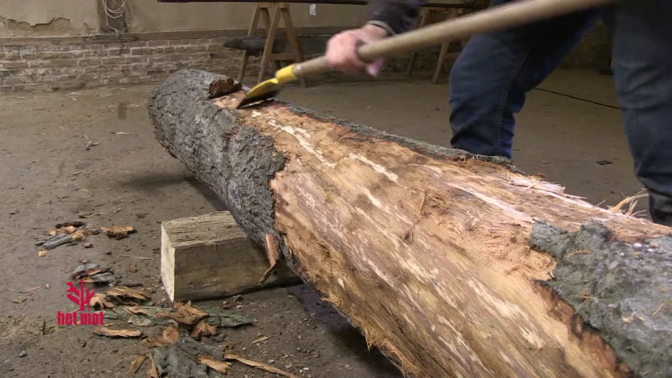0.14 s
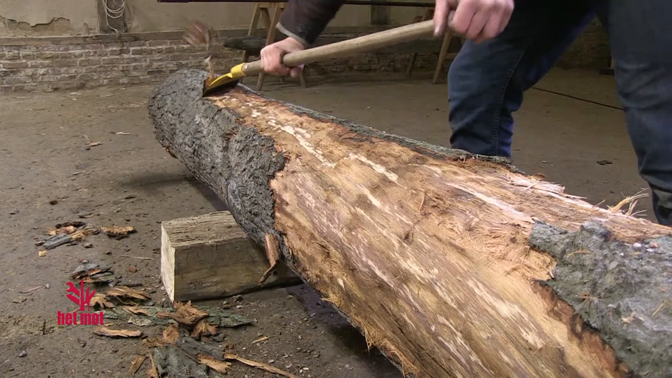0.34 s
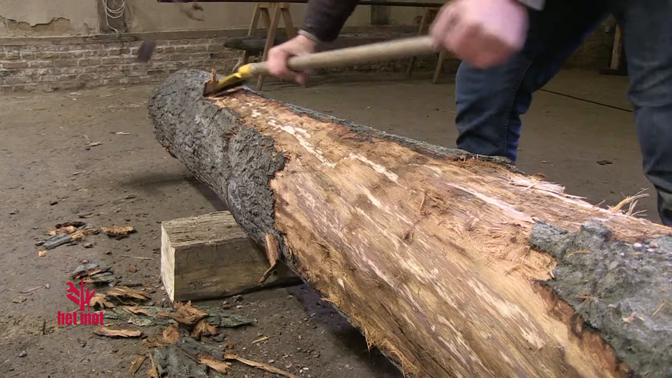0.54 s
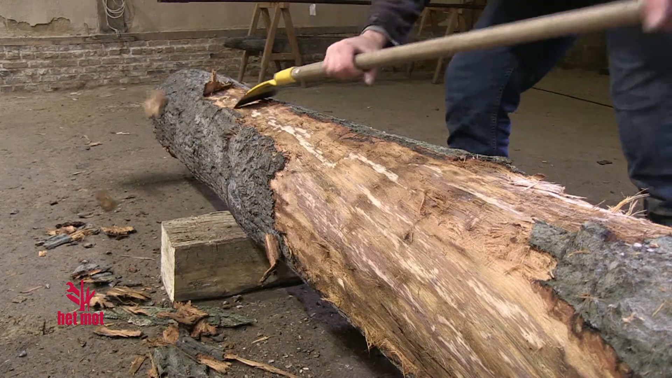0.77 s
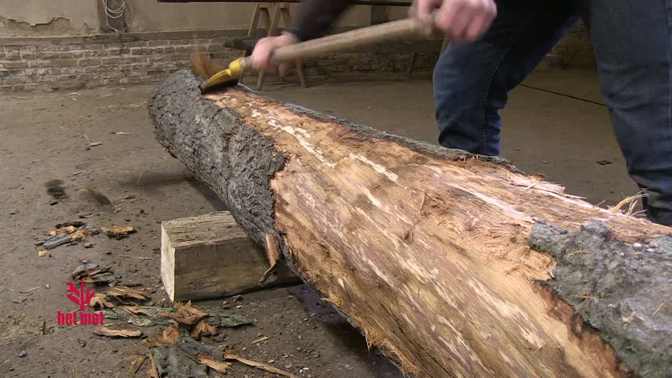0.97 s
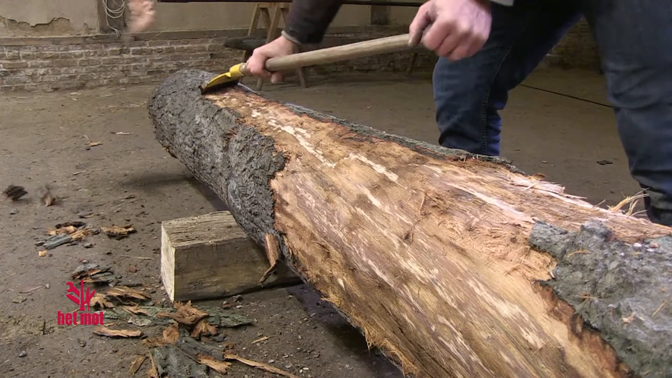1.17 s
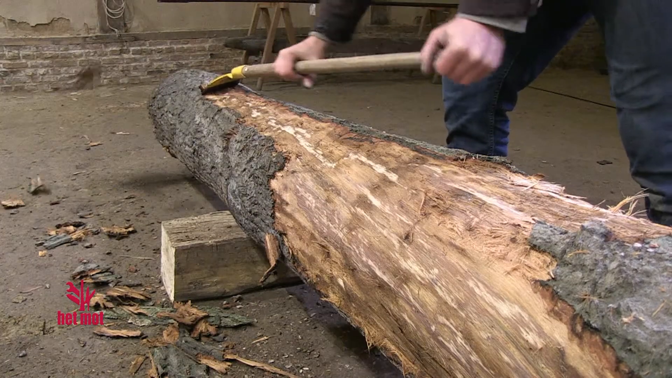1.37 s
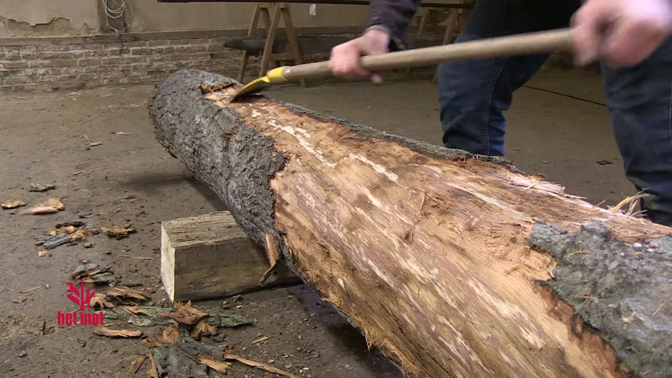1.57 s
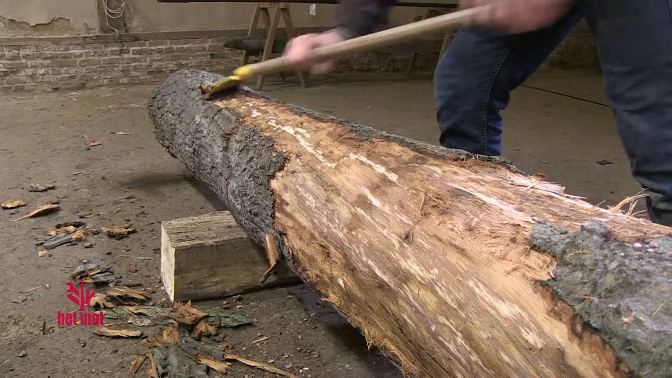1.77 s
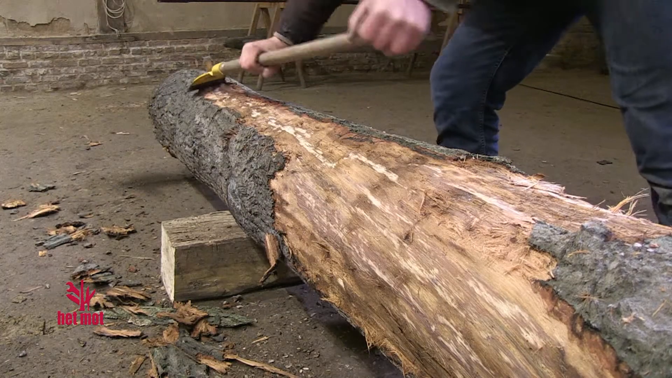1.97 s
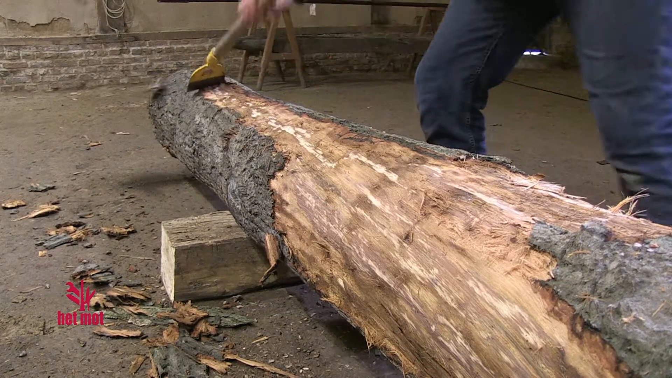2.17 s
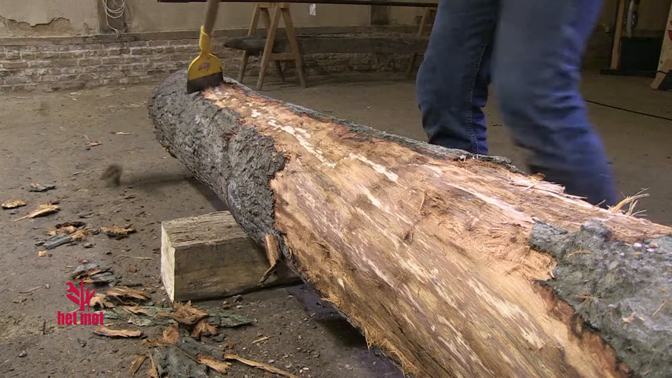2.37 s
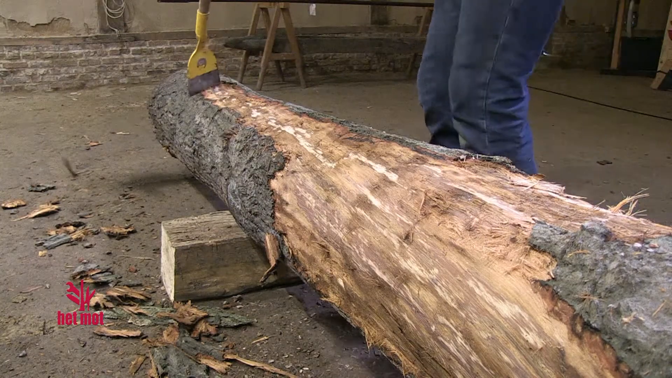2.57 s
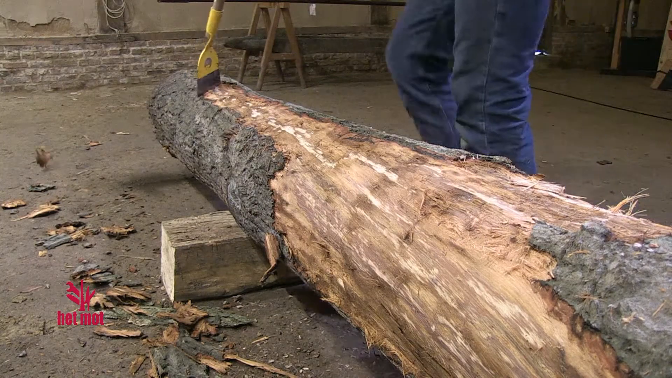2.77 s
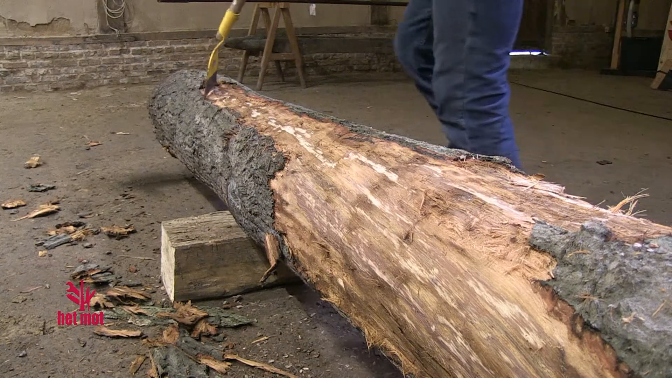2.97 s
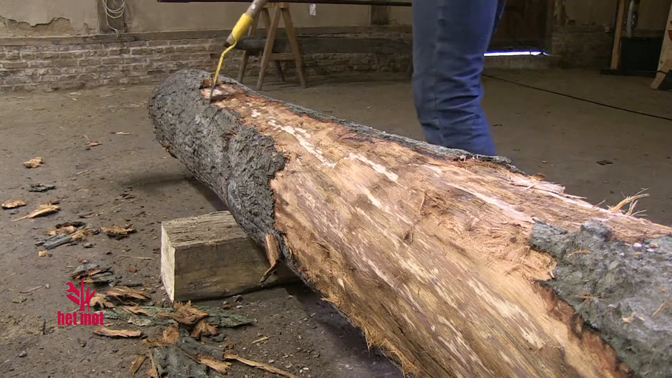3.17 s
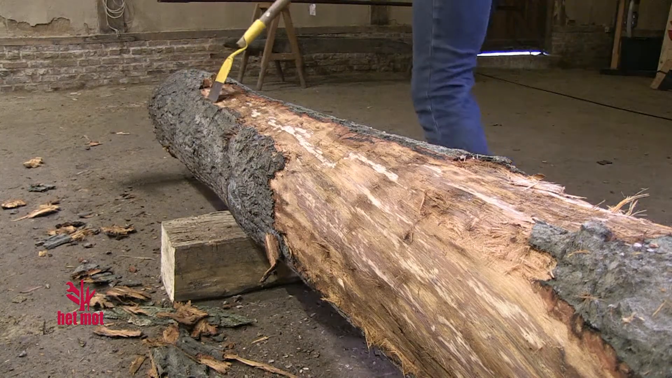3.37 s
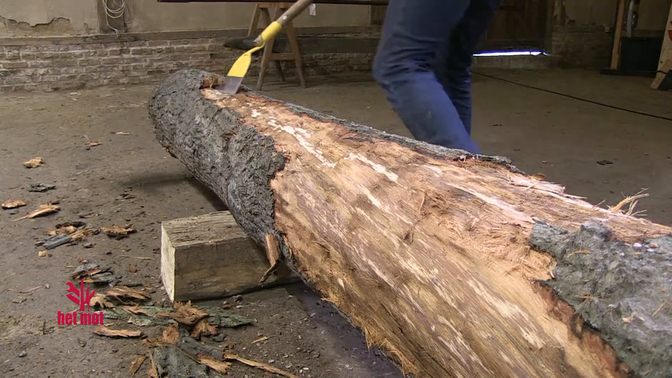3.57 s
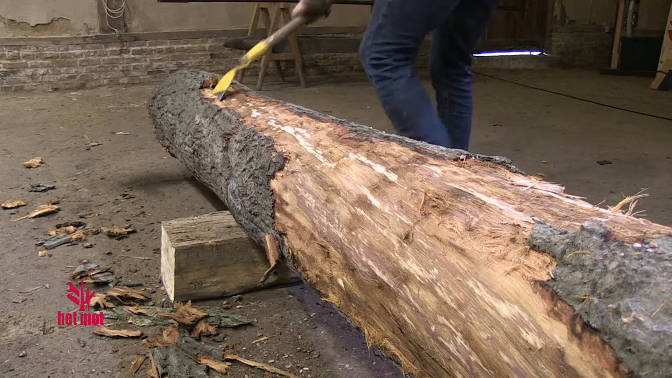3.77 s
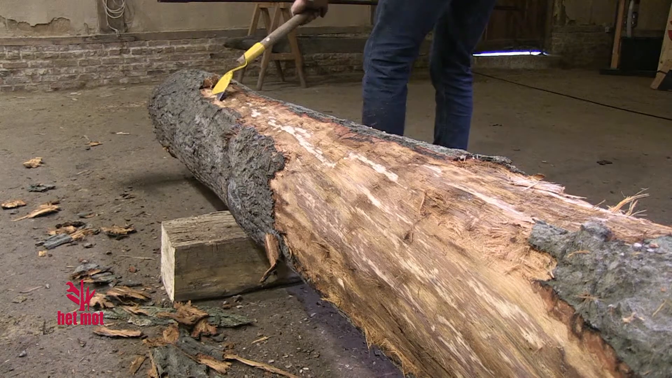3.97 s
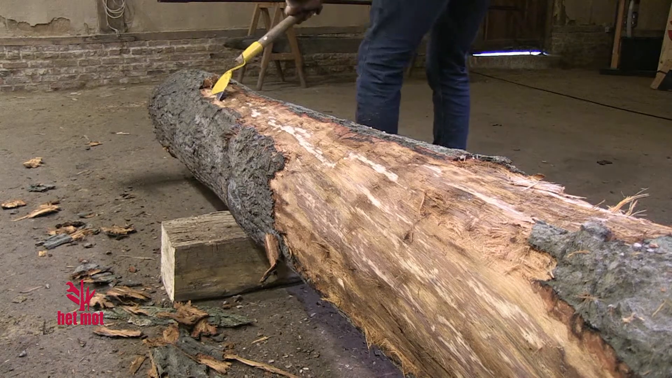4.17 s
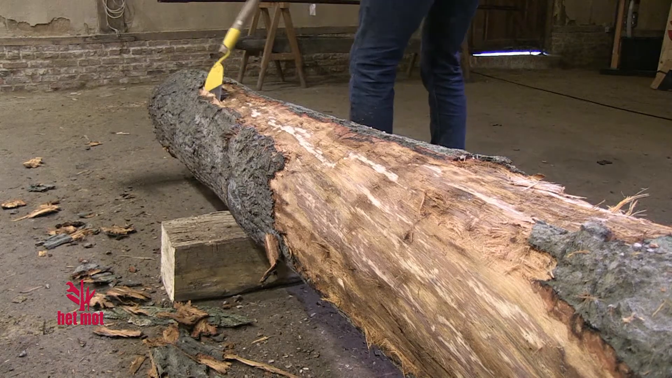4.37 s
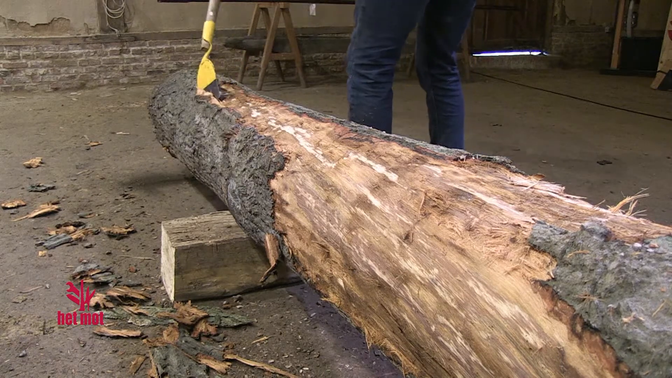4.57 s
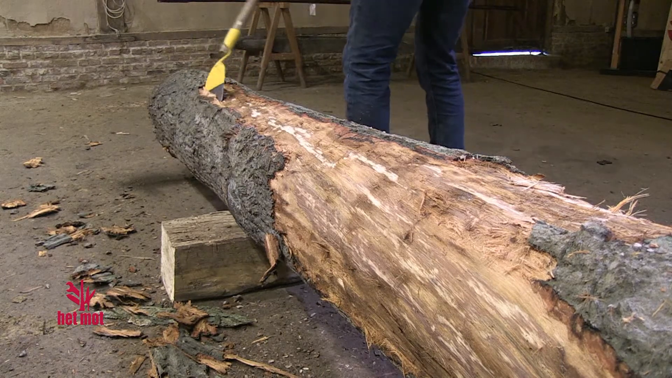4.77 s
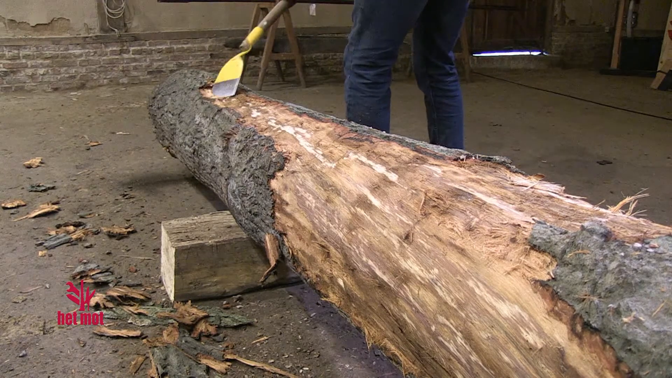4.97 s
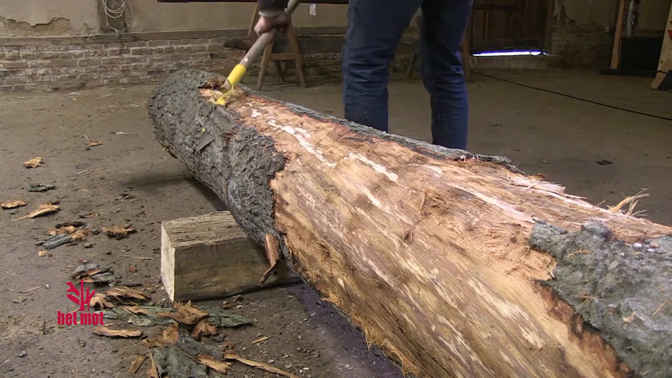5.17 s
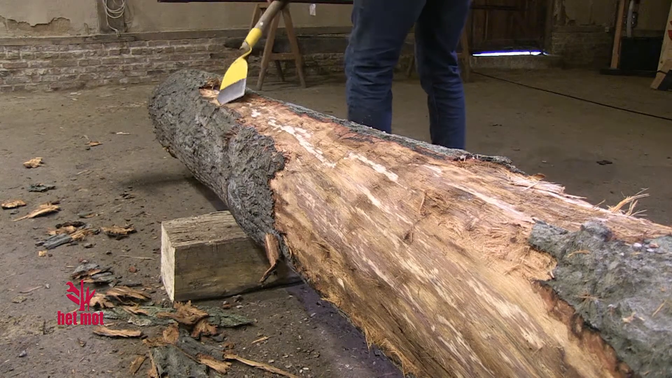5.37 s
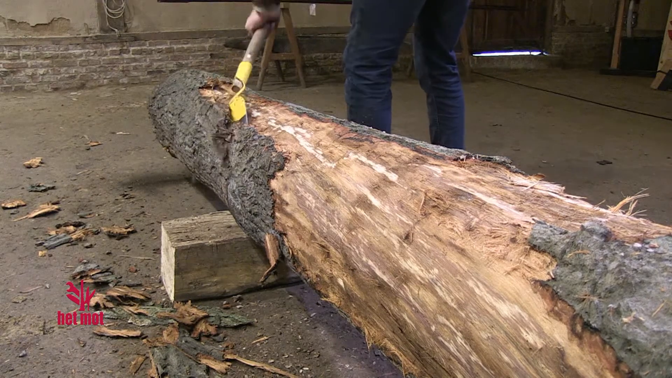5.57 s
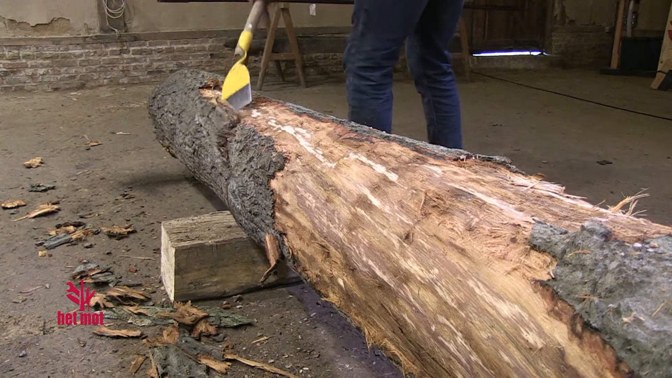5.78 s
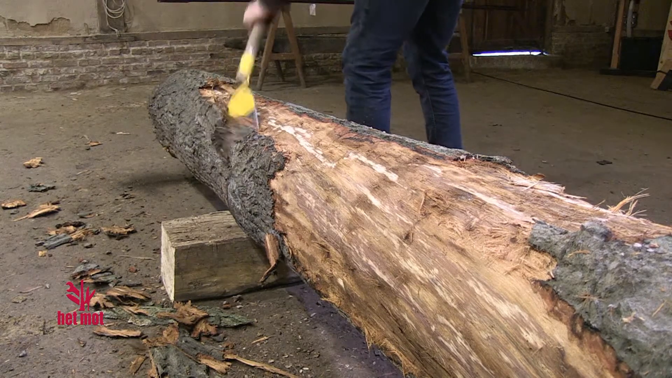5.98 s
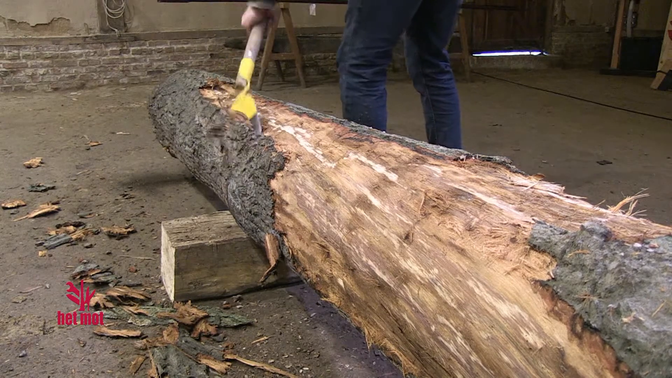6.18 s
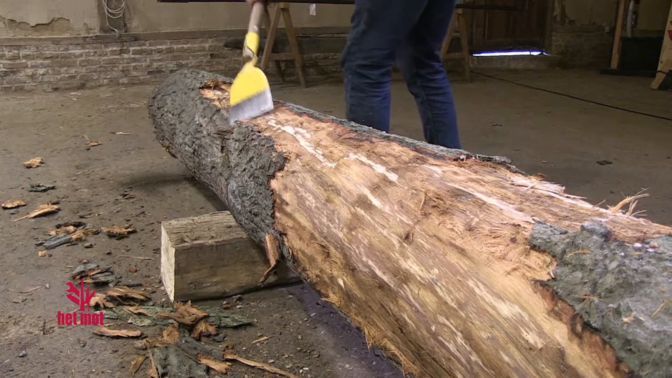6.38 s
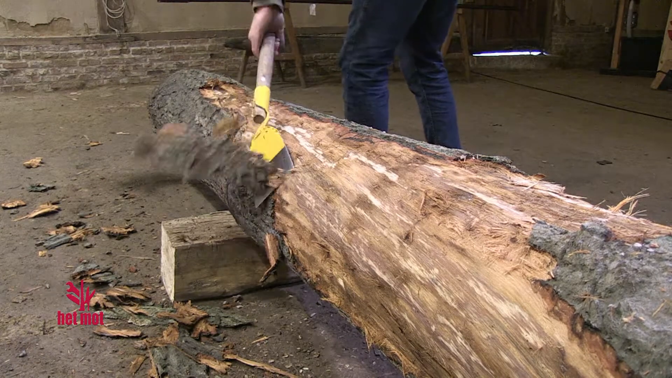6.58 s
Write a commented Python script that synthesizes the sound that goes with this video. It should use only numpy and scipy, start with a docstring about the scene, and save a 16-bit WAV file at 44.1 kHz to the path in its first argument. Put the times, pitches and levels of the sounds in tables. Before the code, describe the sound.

In a brick barn, a steel spade on a long handle strips a log, heard close in mono. A fading drag opens, then a hard push peaks around 0.2 s: metallic rasp, tearing bark, a sharp tick and a low thump. Squeaky light drags at 0.5-0.75 s lead into a double push at 0.85-0.92 s with bright snaps. Crumbs rustle, the blade drags back ringing at 1.4-1.6 s, and a third strong scrape lands near 1.75 s. From 2 to 3.5 s it is much quieter: a small scrape, dull boot and wood knocks, faint metal ringing, shuffling grit. A moderate scrape knocks at 3.7 s, then soft crackles and a tick at 4.3 s. Crunchy shorter pushes follow at 5.0, 5.5, 5.9 and 6.4 s, the last with a hard clank. Low log thuds, short scattered echoes and steady quiet air noise remain underneath.

```python
"""In a brick barn, a steel bark spade on a long handle is pushed and dragged along a log.
The edge stutters over the wood: random clicks and hiss ring the blade, the log and the handle.
Bark tears and crumbles as coloured grit; chips and small hits on the blade tick as tiny noise bursts.
Boots and the log knock dully as short low rings, and the log rocks in slow deep swings.
The barn answers with a short tail of scattered echoes, over steady quiet air noise."""
import sys
import numpy as np
from scipy import signal
from scipy.fft import rfft, irfft, next_fast_len
from scipy.io import wavfile
from scipy.ndimage import uniform_filter1d

SR = 44100
rng = np.random.default_rng(int(sys.argv[2]) if len(sys.argv) > 2 else 0)


def master_out(mix):
    """Clip the mix to full scale and print it as 16-bit PCM to the path in sys.argv[1]."""
    frames = np.transpose(np.atleast_2d(mix))
    ceiling = np.clip(frames, -1, 1)
    pcm = np.round(ceiling * 32767).astype(np.int16)
    wavfile.write(sys.argv[1], SR, pcm)


N = 292505  # length in samples

# the notes the steel blade can ring at, width before damping:
# (pitch_hz, width_hz, flat_db when held flat, upright_db when held upright)
BLADE_MODES = [(1236, 69, -2, -16), (1370, 46, -8.5, -12.5), (1483, 51, -14, -10.5), (2336, 34, -6, -16),
               (2500, 59, -6, -9), (2760, 40, -5.5, -2), (3265, 46, -17, -7.5), (4110, 24, -8.5, -12),
               (4447, 61, -6, -5.5), (5014, 42.7, -13.5, -1.5), (6340, 29, -18, -17.5),
               (6480, 110, -14, -12.5), (6390, 57, -19.5, -30), (7120, 33, -17, -4), (7790, 47, -19, -4),
               (9070, 50, -17, -21.5), (9230, 210, -25.5, -28.5), (9500, 27, -24.5, -18.5),
               (10600, 25, -23, -24.5), (10980, 31, -29.5, -21.5), (11700, 170, -31, -31.5),
               (13500, 60, -23.5, -40), (13130, 210, -31.5, -36.5), (13760, 70, -28, -33.5)]
# the one blade note that squeals, same columns: (pitch_hz, width_hz, flat_db, upright_db)
SQUEAL_MODE = [(4000, 33, -2, -5.5)]
# the colour of tearing bark: (pitch_hz, relative level_db per Hz)
BARK_COLOUR = [(200, -23.5), (500, -3.5), (1300, -1), (2500, -1), (4200, 0), (5500, -8), (6800, -5.5),
               (10000, -14), (15000, -19.5)]


def gain_of(db):
    """Turns decibels into a plain multiplier."""
    return 10 ** (np.asarray(db) / 20)


def evened(x):
    """Scales a sound to an average (rms) level of 1."""
    return x / np.sqrt(np.mean(x ** 2) + 1e-20)


def read(points, hz):
    """Reads a curve between its points, with pitch on a logarithmic scale."""
    point_hz, value = np.transpose(points)
    return np.interp(np.log(hz + 1), np.log(point_hz + 1), value)


def add(mix, start_s, sound):
    """Lays a sound into the mix at its start time, cut off at the end of the mix."""
    part = mix[round(start_s * SR):][:len(sound)]
    part += sound[:len(part)]


def mode(x, hz, width):
    """Rings like one note of a struck object: a two-pole resonance of gain 1 at its centre."""
    r = np.exp(-np.pi * width / SR)  # a wider resonance dies faster
    turn = 2 * np.pi * hz / SR
    return signal.lfilter([(1 - r * r) / 2, 0, (r * r - 1) / 2], [1, -2 * r * np.cos(turn), r * r], x)


def coloured(x, spectrum):
    """Shapes the balance of low and high in a sound, then evens it to rms 1."""
    size = next_fast_len(N)
    shape = gain_of(read(spectrum, np.fft.rfftfreq(size, 1 / SR)))
    return evened(irfft(rfft(x, size) * shape, size)[:N])


def drift(per_s):
    """Slow random wandering of rms about 1; a higher per_s wanders faster."""
    step_rate = 400  # random steps per second
    steps = rng.standard_normal(int(N / SR * step_rate) + 2)
    steps = evened(uniform_filter1d(steps, max(int(step_rate / per_s), 1)))
    return np.interp(np.arange(N) * step_rate / SR, np.arange(len(steps)), steps)


def grit(per_s, spread_db, hiss):
    """Slips of a rough contact: uneven clicks at random moments over a fine hiss, at rms 1."""
    unevenness = np.minimum(rng.exponential(1, N), 4)
    size = gain_of(spread_db * unevenness) * rng.choice([-1., 1.], N)
    clicks = size * (rng.random(N) < per_s / SR)
    return evened(evened(clicks) + hiss * rng.standard_normal(N))


def strokes(rows):
    """Each stroke swells in, holds and dies; gives force, ring share and the last column in dB over time."""
    lift_db = 28  # a stroke starts and ends this far under its level
    force, ring, last_db = np.zeros((3, N))
    for end_s, swell, hold, die, db0, db1, ring0, ring1, db in rows:
        knots = np.cumsum([end_s - hold - swell, swell, hold, die])
        at = np.arange(max(round(knots[0] * SR), 0), min(round(knots[-1] * SR), N))
        one = gain_of(np.interp(at / SR, knots, [db0 - lift_db, db0, db1, db1 - lift_db]))
        force[at] += one
        ring[at] += one * np.interp(at / SR, knots[1:3], [ring0, ring1])
        last_db[at] += one * db
    # where strokes overlap, the stronger one counts for more
    share = 1 / (force + 1e-12)
    # the edge catches and lets go
    unsteady_force = force * gain_of(2.06 * drift(per_s=80))
    return unsteady_force, ring * share, last_db * share


def room_tone():
    """Steady air noise: random noise with a fixed colour."""
    # colour of the quiet air: (pitch_hz, relative level_db per Hz)
    air_colour = [(12, -24.5), (20, -2), (298, -6), (382, -9), (597, -14.5), (746, -18.5), (2090, -27),
                  (2270, -24.5), (2610, -31), (3640, -27.5), (5530, -35.5), (14200, -34), (15500, -48)]
    return gain_of(-57.5) * coloured(rng.standard_normal(N), air_colour)


def blade(slips, modes, damping, wander_db):
    """Slips ring the steel; pressure widens its notes, and the wandering touching point favours some."""
    # how steeply the blade is held: (time_s, steepness from 0 flat to 1 upright)
    steepness = [(.1, 0.066), (.65, 0.015), (.9, 0.4), (1.5, 0.042), (1.75, 0.4), (2.35, 0.27), (2.8, 0.88),
                 (3.599, 0.36), (4.851, 0.7), (5.45, 0.6), (5.751, 0.76), (5.9, 0.81), (6.05, 0.074),
                 (6.2, 0.31), (6.401, 0.8)]
    steep = np.interp(np.arange(N) / SR, *np.transpose(steepness))
    out = np.zeros(N)
    for hz, width, flat_db, upright_db in modes:
        held_db = flat_db + steep * (upright_db - flat_db)
        drive = slips * gain_of(held_db + wander_db * drift(per_s=28))
        ringing = mode(drive, hz, damping * width)
        out += mode(ringing, hz, 7.5 * width)  # second pass deepens the valleys between notes
    return out


def log(rub):
    """The log and handle answer the rubbing with their own low, broad notes."""
    # notes of the log and handle: (pitch_hz, width_hz, relative level_db)
    wood_modes = [(139, 150, -7), (236, 69, 3.5), (307, 30, 6.5), (370, 28, -8.5), (468, 60, 3.5),
                  (567, 110, -1.5), (664, 90, -12.5)]
    return gain_of(11.5) * sum(gain_of(db) * mode(rub, hz, width) for hz, width, db in wood_modes)


def drags():
    """The edge slides: clear blade ring, a squeal that comes and goes, a little hiss."""
    # light drags over bare wood: (lift_s when the edge lifts, swell_s, slide_s, die_s,
    # touch_db force at touch, end_db force at lift, touch_ring share of blade ring 0-1,
    # end_ring share at lift 0-1, squeal_db against force)
    drag_rows = [(0.012, 0.01, 0.011, 0.075, -32, -40.5, 0.86, 0.32, -15),
                 (0.556, .008, 0.034, .06, -45, -36.5, 0.6, 0.6, -5),
                 (0.632, 0.044, 0.047, 0.03, -36.5, -36.5, 0.44, 0.4, 1),
                 (0.724, 0.012, 0.081, 0.025, -30.5, -38, 0.76, 0.7, -9),
                 (1.39, 0.023, 0.048, 0.0093, -51.5, -53, 0.8, 1, -5),
                 (1.495, 0.0084, 0.089, 0.016, -38.5, -45, 0.56, 0.04, -3),
                 (1.58, 0.037, 0.065, 0.068, -29, -37.5, 0.82, 0.4, -9.5),
                 (2.29, 0.087, 0.0064, 0.11, -51, -47.5, 0.36, .7, -9),
                 (2.968, .03, 0.28, 0.017, -62.5, -57.5, .9, .88, -14),
                 (3.134, .015, 0.15, .07, -58.5, -54, 0.99, .75, -14.5),
                 (3.562, 0.045, .11, 0.055, -52, -44.5, 0.92, 1, -23),
                 (3.69, 0.031, 0.063, .02, -58.5, -44, .95, .95, -24),
                 (4.805, 0.0095, 0.049, 0.011, -62, -62.5, .7, 0.9, -9),
                 (4.87, 0.0058, 0.067, 0.095, -54.5, -58.5, 1, 0.76, -11),
                 (5.24, 0.026, .085, 0.24, -50, -50.5, 0.34, 0.32, -9.5),
                 (5.62, .05, .06, 0.034, -52.5, -53.5, .1, 0.2, -3),
                 (5.76, 0.033, 0.13, 0.059, -43, -45.5, 0.36, 0.64, -9.5),
                 (6.165, 0.15, 0.041, 0.032, -32.5, -38.5, 0.7, .9, -10.5),
                 (6.3, .04, 0.13, .01, -52, -56, 0.7, .9, 0)]
    force, ring, squeal_db = strokes(drag_rows)
    slips = grit(per_s=1300, spread_db=2.5, hiss=0.98) * force
    ringing_slips = slips * np.sqrt(ring * (2 - ring))
    steel = gain_of(19) * blade(ringing_slips, BLADE_MODES, damping=1.0, wander_db=3.0)
    squealing_slips = slips * gain_of(squeal_db)
    squeal = gain_of(32.0) * blade(squealing_slips, SQUEAL_MODE, damping=0.36, wander_db=0.3)
    scrape = coloured(grit(per_s=2500, spread_db=3.5, hiss=.9), BARK_COLOUR)
    bark = gain_of(-1.5) * scrape * force * (1 - ring)
    rub = grit(per_s=150, spread_db=5.0, hiss=0.93) * force * gain_of(-9.5)
    return steel + squeal + bark + log(rub)


def barn(x):
    """Echoes as sparse taps of random sign, one in every 20 samples; each band dies at its own speed."""
    # how long the barn rings: (pitch_hz, t60_s time to fall by 60 dB)
    ring_times = [(100, 0.68), (300, 0.78), (1000, 0.53), (4000, 0.56), (13000, 0.23)]
    taps = np.zeros(SR)
    at = np.arange(500, SR - 20, 20)  # the first echo waits about 11 ms
    taps[at + rng.integers(0, 20, len(at))] = rng.choice([-1., 1.], len(at))
    hz, t, bands = signal.stft(taps, SR, nperseg=256)
    fade = gain_of(-60 * t / read(ring_times, hz)[:, None])
    tail = signal.istft(bands * fade, SR, nperseg=256)[1]
    return signal.fftconvolve(x, tail / np.linalg.norm(tail))[:N]


def pushes_and_crackles():
    """Pushes and soft bark crackles: damped blade ring with its squealing note, bark grit, wood body."""
    # pushes of the edge under the bark, hard to faint, and soft crackles of crumbling bark:
    # (hold_end_s, swell_s, hold_s, die_s, start_db force as the hold starts, end_db force as it ends,
    # start_ring share of blade ring 0-1, end_ring share 0-1, body_db of the wood, relative)
    push_rows = [(0.214, 0.094, 0.057, 0.041, -19.5, -11.5, 1, 0.28, 1.5),
                 (0.868, 0.067, 0.016, .012, -17.5, -12, .95, 1, -1.5),
                 (0.922, 0.022, 0.042, .03, -20, -10.5, .75, 0.36, 8),
                 (1.792, 0.091, 0.057, 0.017, -16, -14.5, 0.75, 0.35, 2.5),
                 (2.536, 0.076, 0.045, 0.14, -62, -53, 0.5, 0.3, -1.5),
                 (3.738, 0.054, 0.038, 0.098, -35, -38.5, .7, 0.1, 1),
                 (4.194, 0.061, .01, .3, -55, -53.5, 0, 0.17, -12),
                 (4.5, .006, .18, .1, -50.5, -59, 0.07, 0, -13),
                 (5.005, 0.023, 0.063, 0.18, -43, -31, 1, 0.14, 3),
                 (5.486, 0.075, 0.078, 0.047, -36, -25, 0.76, 0.42, -5),
                 (5.916, .034, .074, 0.095, -32, -21, 1, 0.33, 1),
                 (6.386, 0.02, 0.073, .14, -35.5, -20, 0.94, 0.3, 1.5)]
    force, ring, body_db = strokes(push_rows)
    slips = grit(per_s=1200, spread_db=3.0, hiss=1.0) * force * np.sqrt(ring * (2 - ring))
    steel = gain_of(14.5) * blade(slips, BLADE_MODES, damping=2.1, wander_db=4.5)
    squeal = gain_of(16.5) * blade(slips, SQUEAL_MODE, damping=3.9, wander_db=3.5)
    crunch = coloured(grit(per_s=2300, spread_db=4.5, hiss=0.82), BARK_COLOUR)
    bark = crunch * force * (1 - ring)
    # the wood body grows by only 0.49 of the force in dB
    body_level = force ** 0.49 * gain_of(-26.5 + body_db)
    rub = grit(per_s=300, spread_db=0.0, hiss=0.93) * body_level
    return steel + squeal + bark + log(rub)


def ticks():
    """Chips and small blade hits: a few milliseconds of dying noise around each tick's own pitch."""
    # chips snapping and landing, and small hits on the blade:
    # (start_s, peak_db, pitch_hz, edge_db of the bright edge, relative)
    tick_rows = [(0.0734, -48, 2500, -14), (0.2064, -2.5, 1370, -19), (0.6387, -36, 4000, -18),
                 (0.744, -29.5, 1062, -45), (0.851, -18, 3930, -17), (0.866, -5.5, 4030, -18),
                 (0.9125, 1, 4170, 0), (1.0635, -28, 2700, -14), (1.4042, -33, 1200, -12),
                 (1.7824, -8.5, 1690, -5), (2.2503, -33.5, 2600, -28), (2.4516, -35, 3900, -33),
                 (2.681, -42, 3130, -25), (2.9766, -48, 1000, -26), (3.435, -48, 1500, -20),
                 (3.551, -35, 2800, -31), (3.697, -23.5, 4650, -17), (3.8994, -47, 1520, -18),
                 (3.9454, -42, 3700, -8), (4.172, -49, 4490, -10), (4.182, -36.5, 4500, -11.5),
                 (4.226, -37, 6170, -8), (4.3163, -16.5, 1444, -33), (4.428, -27.5, 3930, -24),
                 (4.497, -37, 3500, -10.5), (4.5266, -41.5, 1560, -18), (4.42, -31, 2180, -22),
                 (4.804, -40, 5160, -28.5), (5.0906, -24.5, 1480, -25), (5.1162, -27.5, 1440, -35),
                 (6.289, -37, 4100, -10), (6.3815, -3, 2760, -42), (6.4005, -11.5, 1180, -23),
                 (6.4144, -6.5, 4050, -12)]
    out, t = np.zeros(N), np.arange(2000) / SR
    noises = rng.standard_normal((len(tick_rows), len(t)))
    for (start_s, db, hz, edge_db), noise in zip(tick_rows, noises):
        snap = 6.1 * (t == 0)  # one sharp click at the very start
        burst = (noise + snap) * gain_of(-60 * t / .014)  # falls by 60 dB in 14 ms
        tick = mode(burst, hz, 0.39 * hz) + gain_of(edge_db) * mode(burst, 6300, 6000)
        add(out, start_s, gain_of(db) * tick / abs(tick).max())
    return out


def thumps():
    """The log rocks on its blocks: slow low swings that swell and die."""
    # the log rocking after a hard stroke: (start_s, jolt_db, sway_db, hum_db)
    rocks = [(0.214, -24, -31.5, -58), (0.92, -25, -29, -60), (1.775, -29.5, -30.5, -60),
             (3.701, -60, -52, -39), (5.0, -60, -43, -60), (5.478, -60, -38.5, -31.5),
             (5.899, -60, -47, -25), (6.37, -57, -48, -27.5), (6.53, -65, -55, -37)]
    # how it rocks, one row each for jolt, sway and hum: (pitch_hz, delay_s, rise_s, t60_s to fall 60 dB)
    swings = [(97, .002, .005, .07), (38, 0.02, .02, .45), (79, .002, .05, .33)]
    out, t = np.zeros(N), np.arange(SR) / SR
    for start_s, *levels_db in rocks:
        for db, (hz, delay, rise, t60) in zip(levels_db, swings):
            swell = 1 - np.exp(-(t / rise) ** 2)
            fade = gain_of(db - 60 * t / t60)
            add(out, start_s + delay, fade * swell * np.sin(2 * np.pi * hz * t))
    return out


def knocks():
    """Boots and wood: a damped low ring with a soft start, under a short woody clack."""
    # dull knocks: (start_s, level_db, pitch_hz, t60_s for the ring to fall 60 dB, clack_db against ring)
    knock_rows = [(0.552, -37, 318, 0.092, 7), (0.741, -26, 314, 0.022, -4.5),
                  (0.901, -16, 300, 0.045, -20), (1.4, -39.5, 638, 0.067, 10),
                  (1.739, -20.5, 311, 0.31, -15), (2.35, -22, 213, 0.016, -23),
                  (2.513, -39, 408, 0.081, -22.5), (2.977, -27, 312, 0.083, -10.5),
                  (3.047, -32, 298, 0.028, -16), (3.135, -28, 275, 0.027, -27),
                  (3.321, -36, 232, 0.072, -23.5), (3.694, -25, 312, 0.068, -10),
                  (4.316, -35, 328.5, 0.033, 7), (4.942, -23, 296, 0.047, -17),
                  (4.997, -17.5, 211, 0.046, -4.5), (5.177, -36, 210, 0.053, -13),
                  (5.304, -40, 282, 0.059, -7.5), (5.473, -20.5, 228, 0.039, -12),
                  (6.378, -22, 532, 0.093, 1)]
    out, t = np.zeros(N), np.arange(8000) / SR
    noises = rng.standard_normal((len(knock_rows), len(t)))
    for (start_s, db, hz, t60, clack_db), noise in zip(knock_rows, noises):
        fade = gain_of(-60 * t / t60)
        # the octave above dies twice as fast, as it is faded twice
        octave = .3 * np.sin(2 * np.pi * 2.0 * hz * t) * fade
        soft_start = 1 - np.exp(-t / 0.0018)
        ring = fade * (np.sin(2 * np.pi * hz * t) + octave) * soft_start
        clack = mode(noise * gain_of(-60 * t / (2.0 * t60)), 740, 1000)
        add(out, start_s, gain_of(db) * (ring + gain_of(clack_db) * clack / abs(clack).max()))
    return out


def rustle():
    """Crumbs settle and boots shuffle: fine dense grit that fades in and out."""
    # rustles between the strokes: (start_s, length_s, start_db, end_db)
    rustles = [(1.094, 0.26, -57, -55.5), (1.932, 0.48, -58, -60), (2.404, 0.34, -57.5, -63.5),
               (3.219, 0.225, -60.5, -63), (3.806, .35, -55.5, -78.5), (4.5, .12, -61.5, -76)]
    # their colour: (pitch_hz, relative level_db per Hz)
    rustle_colour = [(300, 9), (1000, -3), (4000, 5), (6000, -1), (15000, -14)]
    level = np.zeros(N)
    for start_s, length, db0, db1 in rustles:
        size = round(length * SR)
        fades = signal.windows.tukey(size, 3000 / size)  # 1500 samples at each end
        add(level, start_s, gain_of(np.linspace(db0, db1, size)) * fades)
    return level * coloured(grit(per_s=1400, spread_db=5.0, hiss=2.3), rustle_colour)


def scene():
    """Adds all sounds; the barn answers everything but the thumps and the room tone."""
    near = pushes_and_crackles() + drags() + ticks() + knocks() + rustle()
    echoes = gain_of(-14.5) * barn(near)
    return (near + echoes + thumps() + room_tone())[None]


def record(dry):
    """Rounds off the loudest peaks softly, then removes what lies above the band limit."""
    soft = 1.1 * np.tanh(dry / 1.1)
    low_pass = signal.firwin(511, 14950, window=("kaiser", 9), fs=SR)  # limit in Hz
    return signal.oaconvolve(soft, low_pass[None], "same")


dry = scene()
out = record(dry)
master_out(out)
```